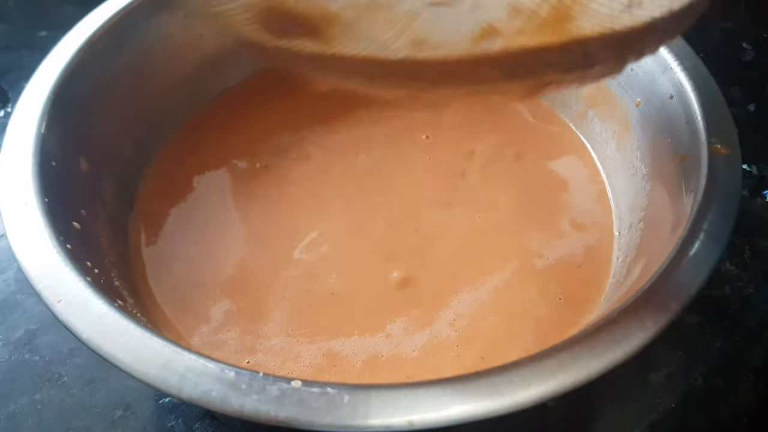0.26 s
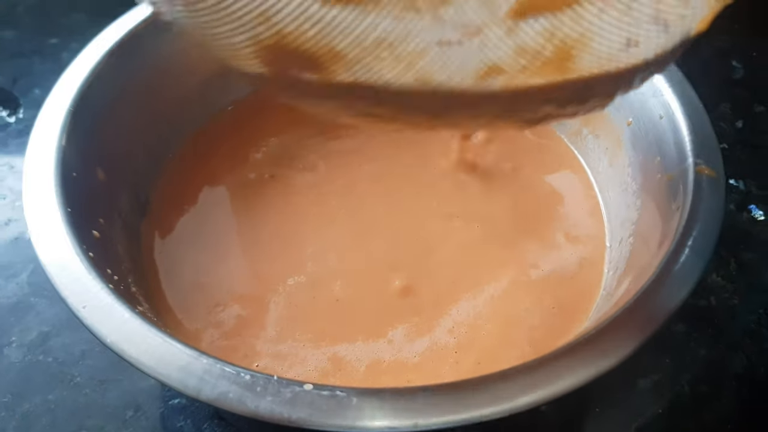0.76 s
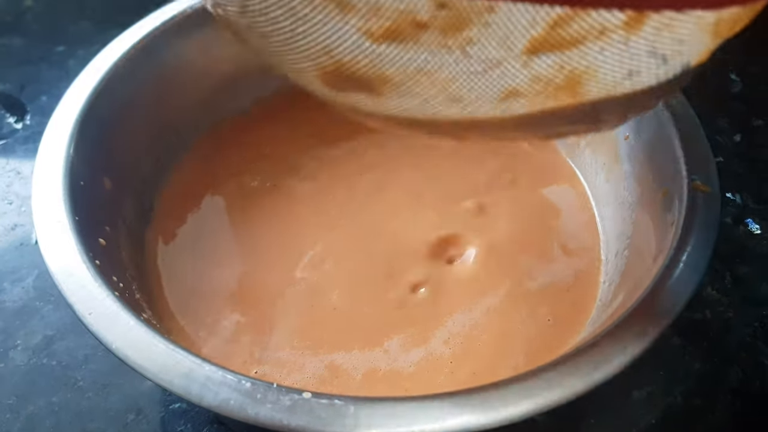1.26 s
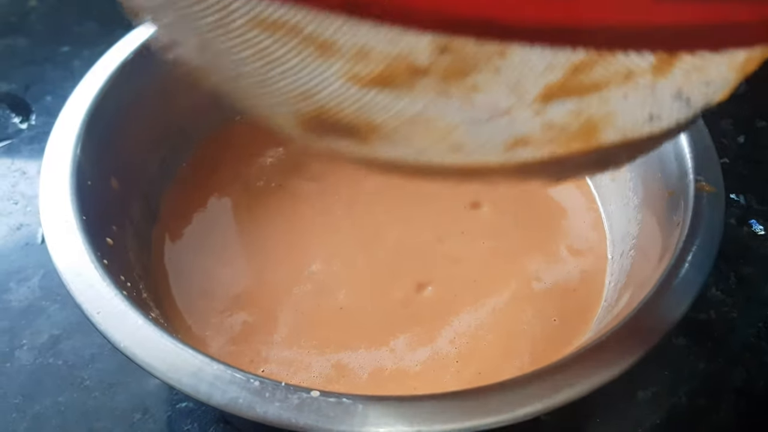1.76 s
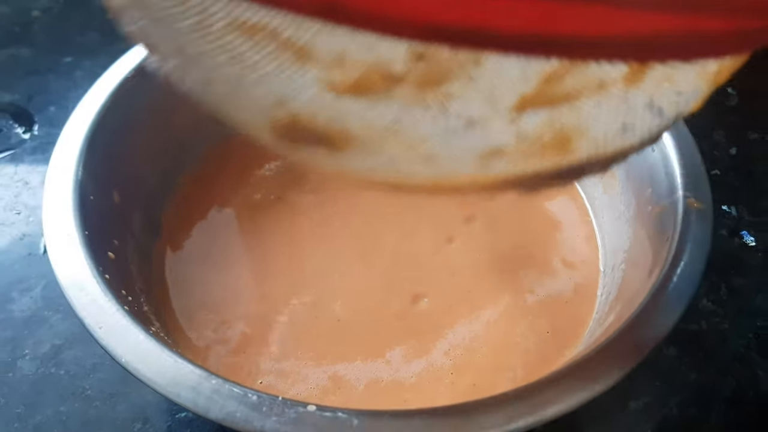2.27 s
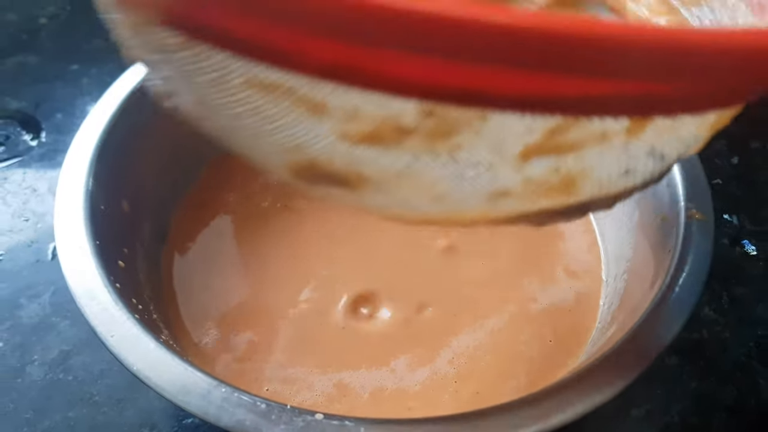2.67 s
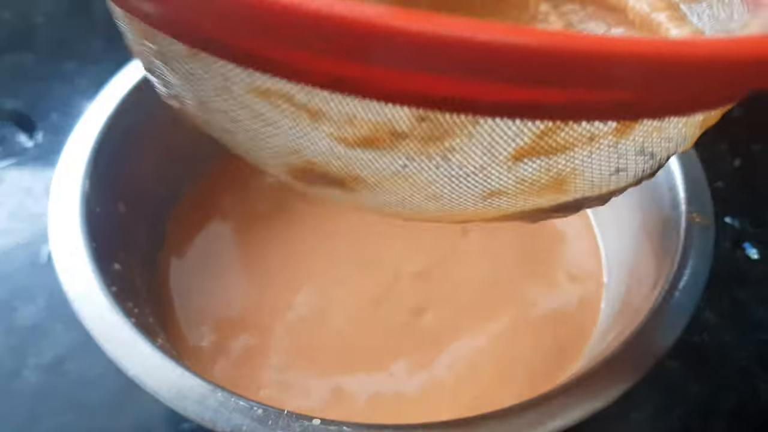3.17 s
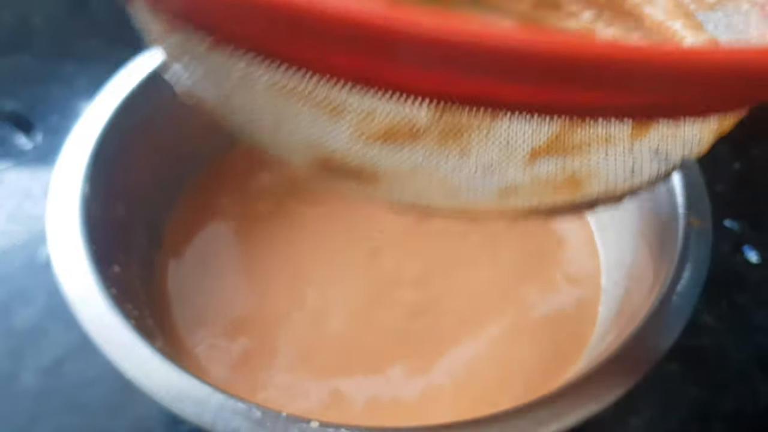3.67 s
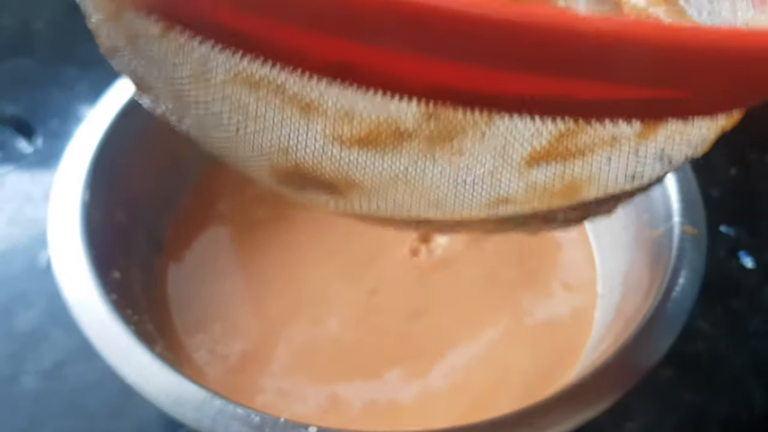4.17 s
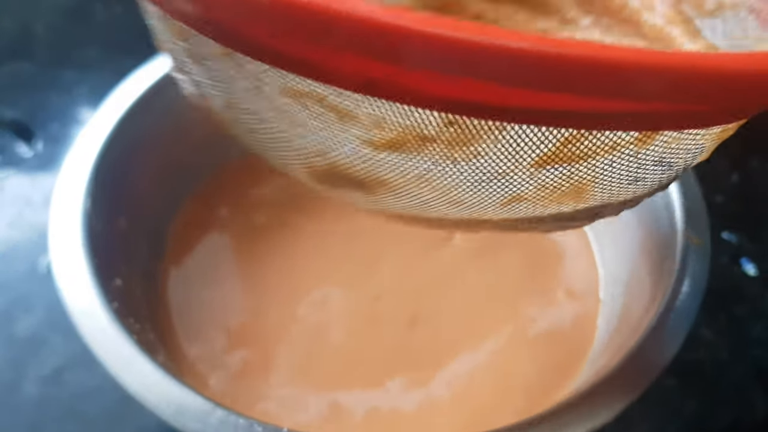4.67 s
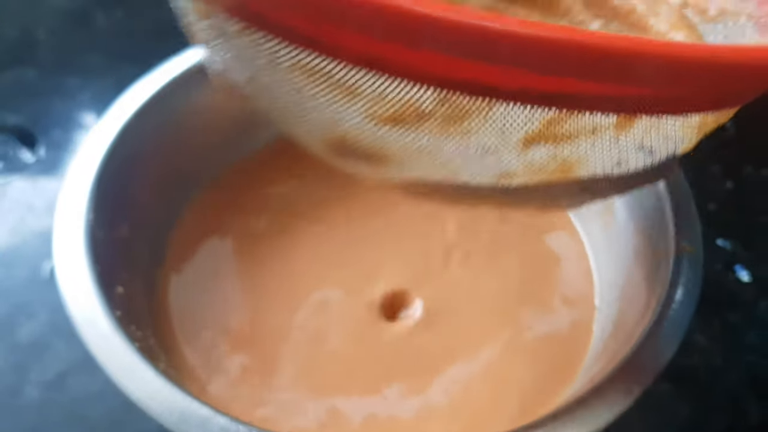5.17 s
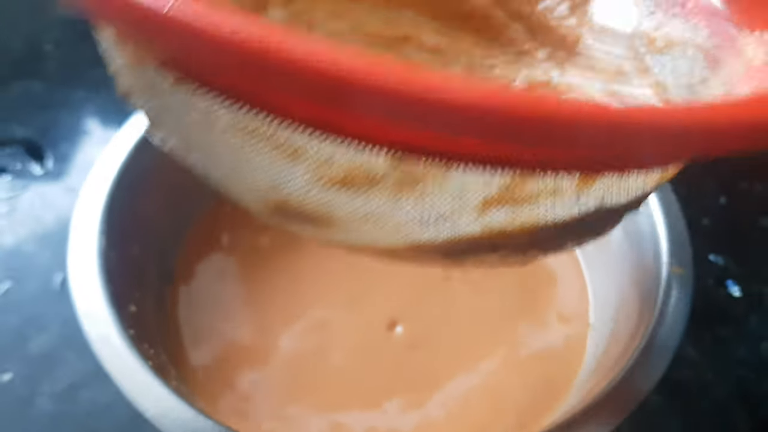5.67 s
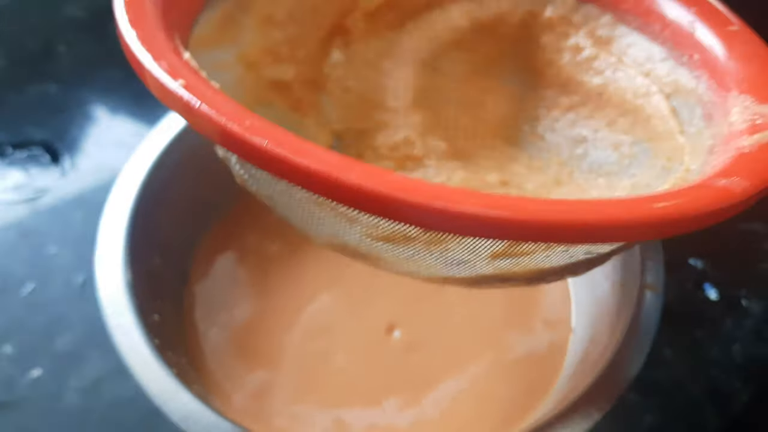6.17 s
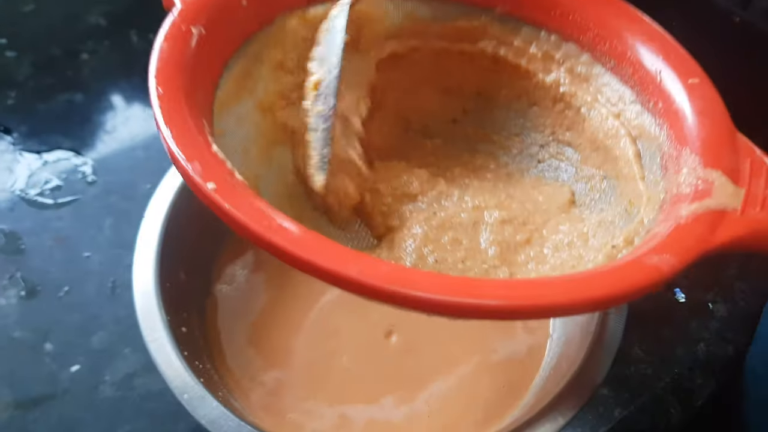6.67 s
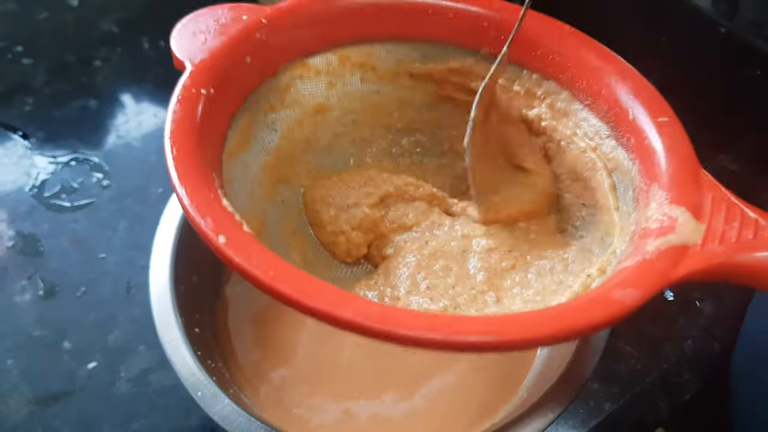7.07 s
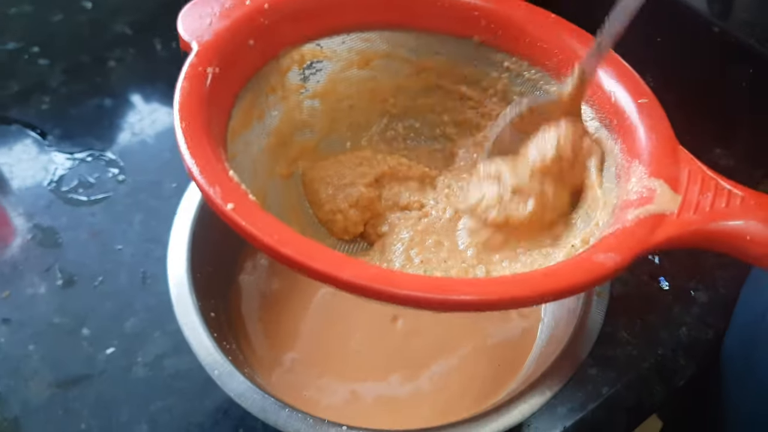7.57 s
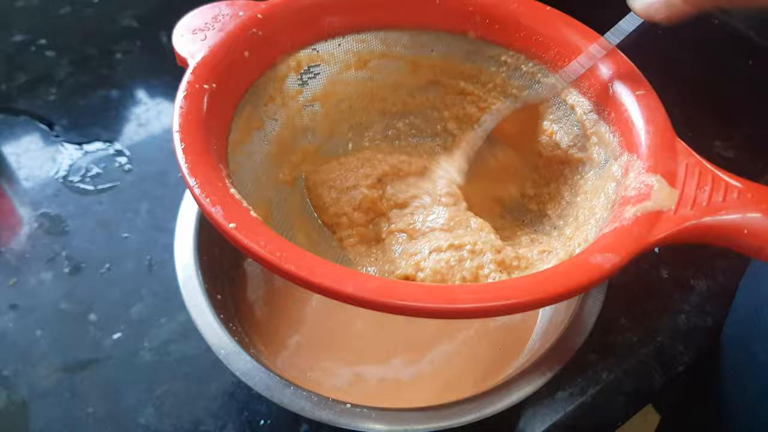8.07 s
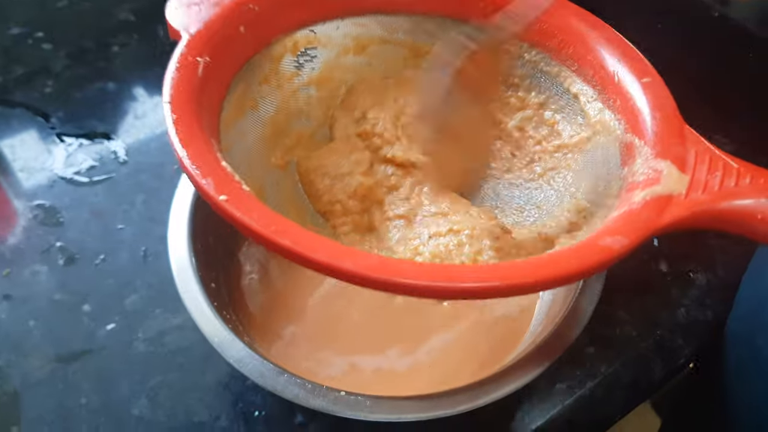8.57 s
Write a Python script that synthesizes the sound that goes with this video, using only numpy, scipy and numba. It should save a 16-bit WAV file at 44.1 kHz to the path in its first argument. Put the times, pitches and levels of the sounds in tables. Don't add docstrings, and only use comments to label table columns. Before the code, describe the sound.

Close stereo phone perspective in a small, hard-walled kitchen. From 0 to 5.6 seconds a metal spoon stirs thick puree round a wire-mesh strainer, roughly three strokes per second. Each stroke swells and fades as a bright, grainy rasp with wet hiss, hollow mesh resonance and a short buzzy zip; light taps mark some landings and the plastic frame rumbles dully. Strokes grow stronger and brighter to a peak around 3.2, then soften again. At 5.7 the rhythm breaks: clustered knocks and short scrapes at 6.0-6.4, a pause, then a hard double knock and the loudest scrape at 6.8-6.9 with a brief steel bowl ring. A long drag follows at 7.3-7.6, then spaced sharp taps with scrapes at 7.9, 8.2 and 8.6. Behind are low compressor hum, soft street air and an engine pulling away faintly, early and again around 5-7.

```python
import sys
import numpy as np
from scipy import signal
from scipy.fft import rfft, irfft
from scipy.io import wavfile
from scipy.ndimage import uniform_filter1d
from numba import njit

SR = 44100
rng = np.random.default_rng(int(sys.argv[2]) if len(sys.argv) > 2 else 0)


def unload_wav(signal):
    wavfile.write(
        sys.argv[1],
        SR,
        np.round(np.clip(np.atleast_2d(signal).T, -1, 1) * 32767).astype(np.int16),
    )


def attenuation_scalar(level_db):
    decades = np.asarray(level_db, float) / 20
    return 10 ** decades


N = 388962
T = np.arange(N) / SR
PORTS = np.array([[1], [-1]])

# touch-down t/s, landing level/dB, rise to fastest/s, peak rasp level/dB, 20 dB swell/s
STIRS = [(-0.06, -47.1, 0.075, -31.0, 0.141), (0.239, -50.1, 0.113, -32.8, 0.113),
         (0.543, -47.8, 0.101, -31.0, 0.095), (0.873, -60.3, 0.097, -32.2, 0.102),
         (1.165, -63.0, 0.119, -32.5, 0.103), (1.478, -61.2, 0.111, -32.3, 0.12),
         (1.778, -43.1, 0.125, -29.3, 0.083), (2.095, -49.1, 0.129, -28.4, 0.062),
         (2.413, -46.1, 0.123, -27.0, 0.047), (2.75, -60.7, 0.081, -25.2, 0.05),
         (3.108, -50.4, 0.051, -22.4, 0.046), (3.393, -52.0, 0.056, -29.2, 0.084),
         (3.652, -37.9, 0.13, -32.9, 0.08), (3.939, -55.0, 0.104, -33.0, 0.12),
         (4.251, -63.5, 0.102, -32.0, 0.107), (4.535, -43.1, 0.114, -32.8, 0.1),
         (4.791, -46.9, 0.147, -33.3, 0.109), (5.125, -42.0, 0.134, -33.6, 0.137),
         (5.44, -62.5, 0.096, -30.3, 0.086)]
# touch-down t/s, landing level/dB, attack/s, peak rasp level/dB, time to lift/s
SCRAPES = [(2.66, -59.6, 0.07, -56.9, 0.081), (2.9, -50.6, 0.063, -49.1, 0.159),
           (3.26, -49.8, 0.066, -53.2, 0.147), (5.714, -32.6, 0.003, -41.6, 0.021),
           (5.889, -45.7, 0.024, -35.0, 0.079), (6.046, -42.8, 0.008, -31.4, 0.016),
           (6.243, -47.8, 0.046, -30.6, 0.078), (6.378, -32.6, 0.023, -32.6, 0.047),
           (6.772, -47.7, 0.003, -44.2, 0.015), (6.83, -40.2, 0.024, -17.2, 0.031),
           (6.87, -42.4, 0.042, -30.0, 0.123), (7.212, -50.0, 0.036, -43.7, 0.098),
           (7.297, -35.2, 0.1, -26.1, 0.267), (7.929, -40.2, 0.073, -39.1, 0.101),
           (8.235, -48.3, 0.104, -31.5, 0.185), (8.628, -35.1, 0.006, -44.7, 0.003),
           (8.65, -55.2, 0.036, -41.1, 0.066)]
# touch-down t/s, landing level/dB, attack/s, peak rasp
# level/dB, time to lift/s
MORE_SCRAPES = [(2.755, -52, .03, -46, .05), (3.49, -44, .03, -41, .06), (5.6, -44, .04, -43, .11),
                (6.4, -42, .022, -36, .025), (7.365, -36, .04, -28, .055)]
# middle t/s, wire crossings f/Hz, glide/(octave/s), level/dB, octave level/dB
ZIPS = [(0.985, 470, 0, -42, -39), (1.3, 474, .3, -39, -49), (1.6, 461, -.8, -43, -42),
        (1.92, 488, 3.5, -40.5, -43), (2.22, 485, 3, -41.5, -33), (2.535, 490, 3, -58, -33),
        (2.815, 515, 5, -55, -25), (2.872, 630, -5, -36, -48), (3.164, 730, 1, -29, -37),
        (3.441, 612, -1, -34.5, -42), (3.77, 360, 6, -50, -48), (4.025, 370, 1, -45.5, -41.5),
        (4.335, 480, 5, -40, -39), (4.62, 362, 2.5, -43.5, -38), (4.93, 445, 8, -46, -43),
        (6.919, 403, -5, -48, -35), (6.982, 286, 0, -50, -31), (7.255, 488, 2.5, -45, -52),
        (7.328, 397, 0, -43, -38), (7.545, 385, -2.7, -48, -48), (8.378, 568, 2.5, -42, -52),
        (8.715, 430, -2.8, -42, -52)]
# t/s, cup level/dB re rasp, rim level/dB re rasp, skin f/Hz
HOLD = [(0, 2.5, -5, 980), (1.35, 3, -2.5, 930), (1.92, 1, -3, 940), (2.55, 0, -3.5, 947),
        (2.84, -1, -2, 1040), (3.17, -4, -3.5, 800), (3.46, 0, -2.5, 920), (5.7, 1.5, -1.5, 880),
        (6.09, 2.5, 1, 863), (6.3, 0, -3, 928), (6.85, -7, -9, 1010), (6.93, -3, 7, 760),
        (7.39, -4, 2, 819.4), (7.56, -5.5, -7, 800), (7.98, 4, 0, 960), (8.28, 0, -2, 900),
        (8.41, -3, 5, 850), (8.7, 1, -9, 737)]
# f/Hz, level/dB per Hz
RASP = [(1470, -19), (2500, 0), (5450, -0.5), (7290, -4.5), (7950, -14.5), (9090, -4.5), (12000, -1),
        (15300, -8), (16000, -31.5), (16400, -42)]
# f/Hz, width/Hz, level/dB
CUP_MODES = [(685, 53, -8), (790, 75, 2.5), (899, 69, 3.5), (1126, 254, 4), (1217, 47, -6.5)]
# f/Hz, width/Hz, level/dB
RIM_MODES = [(1485, 180, -3), (1763, 76, 0.5), (1969, 74, 2), (2260, 570, -13)]
# t/s, peak level/dB, drum f/Hz, crack level/dB re peak
TAPS = [(0.244, -24.5, 929, -12), (0.545, -25, 939, -11), (0.699, -18, 693, -5), (1.084, -25.5, 790, -9),
        (2.412, -24.5, 912, -7.5), (2.962, -26.5, 900.2, -4), (3.039, -28.5, 890.6, -10),
        (3.32, -37, 1090, -4), (3.653, -23, 972, -6), (5.128, -23.5, 1000, -8.5), (5.716, -26.5, 1011, 0.5),
        (6.049, -17.5, 980, -14), (6.063, -12, 797, -17), (6.099, -30, 727, 0), (6.139, -34, 1010, -5),
        (6.379, -16, 942, -9), (6.419, -29, 907, -10.5), (6.773, -17, 1031, -17), (6.784, -15, 644, -28),
        (6.785, -13, 980, -21), (6.858, -13, 1200, -6), (6.874, -14.5, 938.6, -12), (7.214, -24, 920, -12),
        (7.299, -19, 800.5, -6.5), (7.729, -44, 651, -7), (7.799, -43, 738, -14), (7.929, -8, 993, -15),
        (8.235, -16, 664, -13), (8.628, -14.5, 685, -12), (8.787, -37, 688, -1)]
# t/s, peak level/dB, f/Hz, t60/s
BOWL_RINGS = [
    (6.9, -25, 1555, 0.25),
    (6.99, -34, 564, 0.27),
]
# t/s, level/dB
FLEXES = [(.11, -38), (.41, -38.5), (.72, -38), (1.03, -42.5), (1.33, -43.5), (1.64, -42.5), (1.95, -46),
          (3.5, -44), (3.8, -46), (4.13, -44.5), (4.4, -44), (4.7, -47), (5.001, -46.5), (5.3, -44),
          (5.6, -42), (6.97, -60)]
# f/Hz, width/Hz, level/dB
FRAME_MODES = [(211, 140, -5.5), (279, 106, 5.5)]
# f/Hz, level/dB rms
HUM = [(53, -45.5), (97, -65), (105.5, -63), (264, -59), (397, -61), (528, -66)]
# t/s, firing f/Hz, level/dB
ENGINE = [
    [(0, 61.85, -46), (.75, 63.1, -45), (1.3, 63.7, -41), (1.7, 64.5, -47), (2.2, 66.62, -62),
     (3.0, 68.87, -53), (3.7, 70, -60)],
    [(4.4, 58.8, -67), (5.1, 61.2, -50), (5.5, 61.5, -42.5), (6.0, 63.4, -43), (6.4, 65.43, -48),
     (6.9, 68.9, -54), (7.4, 71, -63)],
]
# multiple of firing f, level/dB rms
ENGINE_ORDERS = [
    [(1.4, -58.5), (1.82, -63)],
    [(1.28, -65), (1.47, -58), (2, -62.5)],
]
# f/Hz, level/dB per Hz
AIR = [(30, -13), (45, -4), (90, 4.5), (125, -4.5), (190, -1.5), (300, 1), (400, -11.5), (470, -10),
       (1900, -19), (6000, -33), (16000, -52)]


def scrape():
    rasp_db = contact()
    press_db = uniform_filter1d(rasp_db, SR // 50)
    load_db = np.clip(press_db, -70, None) + 35
    hold_s, *columns = np.transpose(HOLD)
    cup_db, rim_db, skin_hz = (np.interp(T, hold_s, column) for column in columns)
    cup_db = cup_db - 0.05 * load_db
    rim_db = rim_db - 0.1 * load_db
    skin_hz = skin_hz + 1.5 * load_db

    zips, edges, cycle = weave(jitter=0.015, over_under=0.18)
    grip = attenuation_scalar(rasp_db + 1.78 * walk(60)) * (1 + 0.77 * cycle)
    share = attenuation_scalar([4.5 * walk(12) for _ in range(3)])
    share = share / np.sqrt(np.sum(share ** 2, axis=0))
    rasp_response = colour(RASP)[None]
    sound, wires = 0, 0
    for part in share:
        rasp_path = unit(signal.fftconvolve(tail(0.015)[:, :1024], rasp_response)[:, :1024])
        cup_path = body(CUP_MODES, 0.6, 0.075)
        rim_path = body(RIM_MODES, 1.74, 0.031)
        patch = level(ticks(6000.0, 3.05), 0) * part * grip
        sound = sound + through(patch[None], np.concatenate([rasp_path, cup_path, rim_path]))
        wires = wires + patch

    skin = attenuation_scalar(15.0) * resonate(wires, np.clip(skin_hz, 400, 1500), 136.0)
    hoop = attenuation_scalar(14.5) * resonate(wires, 1950 * (1 + 0.03 * walk(9)), 220.0)
    rasp = sound[:2]
    cup = (sound[2:4] + skin) * attenuation_scalar(cup_db)
    rim = (sound[4:] + hoop) * attenuation_scalar(rim_db)
    rim = rim + attenuation_scalar(-26) * through(edges[None], body(RIM_MODES, 1.62, 0.01))

    hiss = attenuation_scalar(-3) * through(rng.standard_normal((2, N)) * grip, unit(rasp_response))
    lean_db = np.clip(3.5 + 0.06 * (press_db + 22.5), 0, None)
    rasp = (mirrored(rasp) + hiss) * attenuation_scalar(-0.5 + PORTS * lean_db)
    mesh = rasp + rim * attenuation_scalar(1.7 * PORTS - 0.5) + cup * attenuation_scalar(1.63 * PORTS - 0.6)
    open_mesh = signal.butter(4, 360, "high", fs=SR, output="sos")
    return signal.sosfilt(open_mesh, mesh) + zips * attenuation_scalar(1.1 * PORTS + 5.5)


def contact():
    landing_db_per_s, ebb_stretch, swell_power, drag_db = 180, 1.43, 1.22, -62
    ease_s, ease_db = 0.105, -14
    sag_db_per_s, lift_db_per_s = 90, 800
    smear_db, smear_db_per_s = -9, 165
    stir_end_s = SCRAPES[4][0]
    power = attenuation_scalar(2 * drag_db) * (T < stir_end_s) + attenuation_scalar(-180)

    ends_s = [row[0] for row in STIRS[1:]] + [stir_end_s]
    for (start_s, land_db, rise_s, peak_db, swell_s), end_s in zip(STIRS, ends_s):
        down = slice(max(int(start_s * SR), 0), int(end_s * SR))
        late_s = T[down] - start_s - rise_s
        span_s = np.where(late_s > 0, ebb_stretch * swell_s, swell_s)
        sweep_db = peak_db - 20 * np.abs(late_s / span_s) ** swell_power
        sweep_db = sweep_db + ease_db * np.clip(1 - (end_s - T[down]) / ease_s, 0, 1)
        landing_db = land_db - landing_db_per_s * (T[down] - start_s)
        power[down] += attenuation_scalar(2 * sweep_db) + attenuation_scalar(2 * landing_db)

    for start_s, land_db, attack_s, peak_db, lift_s in SCRAPES + MORE_SCRAPES:
        down = slice(int(start_s * SR), int(start_s * SR) + SR // 2)
        t = T[down] - start_s
        sag_s = np.clip(t - attack_s, 0, max(lift_s - attack_s, 0))
        held_db = np.interp(t, [0, attack_s], [land_db, peak_db]) - sag_db_per_s * sag_s
        off_s = np.clip(t - lift_s, 0, None)
        power[down] += attenuation_scalar(2 * (held_db - lift_db_per_s * off_s))
        power[down] += attenuation_scalar(2 * (held_db + smear_db - smear_db_per_s * off_s))
    return uniform_filter1d(10 * np.log10(power), SR // 200)


def weave(jitter, over_under):
    zip_s, edge_db = 0.068, -11
    hz, first, second = np.full(N, 400.0), np.zeros(N), np.zeros(N)
    for middle_s, rate_hz, glide, db, octave_db in ZIPS:
        inside = slice(int((middle_s - zip_s / 2) * SR), int((middle_s + zip_s / 2) * SR))
        t = T[inside] - middle_s
        arc = (2 * t / zip_s) ** 2
        slowing = 0.5 * (rate_hz / 720) ** 3 * arc
        hz[inside] = rate_hz * 2 ** (glide * t - slowing)
        first[inside] = attenuation_scalar(db + edge_db * arc)
        second[inside] = attenuation_scalar(octave_db + edge_db * arc)
    first, second = uniform_filter1d([first, second], SR // 150)
    turn = 2 * np.pi * np.cumsum(hz * (1 + jitter * walk(250))) / SR
    stand = 1 + over_under * np.cos(turn / 2)
    tone = first * np.sin(turn) + second * np.sin(2 * turn)
    edges = np.sqrt(np.abs(first * second)) * sum(np.cos(k * turn) for k in range(3, 8))
    cycle = (first > attenuation_scalar(-90)) * np.cos(turn)
    return stand * tone, stand * edges, cycle


def ticks(rate_hz, scatter_db):
    moment, force = rng.random((2, N))
    sign = np.sign(moment - rate_hz / SR / 2)
    return sign * (moment < rate_hz / SR) * attenuation_scalar(-scatter_db * np.log(force + 0.022))


def mirrored(x):
    lags_s = [np.clip(0.0007 + 0.0002 * walk(7), 0, None) for _ in x]
    echo = np.array([np.interp(T - lag_s, T, port) for lag_s, port in zip(lags_s, x)])
    return x + attenuation_scalar(-7) * echo


def taps():
    out = np.zeros((2, N + 8192))
    chance = rng.standard_normal((len(TAPS), 2, 1024))
    crack_response = unit(colour(RASP))[None]
    for (s, db, hz, crack_db), noise in zip(TAPS, chance):
        start = int(s * SR)
        crack = through(noise * np.exp(-T[:1024] / 0.0015), crack_response)[:, :1024]
        drum = attenuation_scalar(-5.5) * ring(hz, 100, size=1024)
        blow = drum + attenuation_scalar(crack_db + 1) * crack * attenuation_scalar(2.5 * PORTS)
        out[:, start:start + 1024] += attenuation_scalar(db) * blow
    for s, db, hz, t60_s in BOWL_RINGS:
        start = int(s * SR)
        swell = 1 - np.exp(-T[:8192] / 0.0049)
        out[:, start:start + 8192] += attenuation_scalar(db) * swell * ring(hz, np.log(1000) / np.pi / t60_s)
    return out[:, :N]


def frame():
    load = sum(attenuation_scalar(db) * np.exp(-((T - s) / 0.049) ** 2) for s, db in FLEXES)
    return through(rng.standard_normal((1, N)) * load, body(FRAME_MODES, 0.16, 0.012))


def walls(x):
    low, high = (signal.butter(1, 2500, kind, fs=SR, output="sos") for kind in ("low", "high"))
    response = attenuation_scalar(-8) * signal.sosfilt(low, tail(0.42)) + attenuation_scalar(-16.5) * signal.sosfilt(high, tail(0.093))
    return through(x.mean(axis=0)[None], response)


def compressor():
    clock = 2 * np.pi * np.cumsum(1 + 0.001595 * walk(3)) / SR
    lines = sum(attenuation_scalar(db) * np.sin(hz * clock) for hz, db in HUM)
    return np.sqrt(2) * attenuation_scalar(0.35 * walk(7.3)) * lines * attenuation_scalar(1.3 * PORTS)


def engine():
    out = np.zeros(N)
    for (s, hz, db), orders in zip(map(np.transpose, ENGINE), ENGINE_ORDERS):
        turn = 2 * np.pi * np.cumsum(np.interp(T, s, hz)) / SR
        fade = np.clip(np.minimum(T - s[0] + 0.31, s[-1] + 0.26 - T) / 0.48, 0, 1)
        firing = attenuation_scalar(np.interp(T, s, db)) * np.sin(turn)
        upper = attenuation_scalar(2.8 * walk(3)) * sum(attenuation_scalar(order_db) * np.sin(k * turn) for k, order_db in orders)
        out = out + fade * (firing + upper)
    return np.sqrt(2) * out * attenuation_scalar(1.3 * PORTS)


def air():
    mid, side = rng.standard_normal((2, N))
    side = signal.sosfilt(signal.butter(1, 400, "high", fs=SR, output="sos"), side)
    wash = through(np.array([mid + side, 0.82 * (mid - side)]), colour(AIR, size=4096)[None])
    return level(wash, -50.5) * attenuation_scalar(1.44 * walk(0.73))


def level(x, db):
    return x * attenuation_scalar(db) / np.sqrt(np.mean(x ** 2))


def unit(response):
    return response / np.sqrt(np.mean(np.sum(response ** 2, axis=-1)))


def through(x, response):
    return signal.oaconvolve(x, response, axes=-1)[..., :N]


def colour(points, size=2048):
    hz, db = np.transpose(points)
    bins_hz = np.arange(size // 2 + 1) * SR / size
    log_gain = np.interp(np.log(bins_hz + 1), np.log(hz), db) * np.log(10) / 20
    cepstrum = irfft(log_gain)
    cepstrum[1:size // 2] *= 2
    cepstrum[size // 2 + 1:] = 0
    return irfft(np.exp(rfft(cepstrum)))[:size // 2]


def ring(hz, width_hz, size=8192):
    return np.exp(-np.pi * width_hz * T[:size]) * np.sin(2 * np.pi * hz * T[:size])


def body(modes, spread_rad, detune):
    phases = spread_rad * rng.standard_normal((len(modes), 2, 1))
    shifts = 1 + detune * rng.standard_normal(len(modes))
    t, out = T[:1024], 0
    for (hz, width_hz, db), phase, shift in zip(modes, phases, shifts):
        decay = attenuation_scalar(db) * np.sqrt(width_hz) * np.exp(-np.pi * width_hz * t)
        out = out + decay * np.sin(2 * np.pi * hz * shift * t + phase)
    return unit(out)


def tail(t60_s):
    decay = rng.standard_normal((2, SR // 2)) * np.exp(-np.log(1000) * T[:SR // 2] / t60_s)
    return decay / np.sqrt(np.sum(decay ** 2, axis=1, keepdims=True))


def walk(rate_hz):
    k = int(SR / rate_hz)
    held = np.repeat(rng.standard_normal(4096)[:N // k + 1], k)[:N]
    return 1.33 * uniform_filter1d(uniform_filter1d(held, k), k)


@njit
def resonate(x, hz, width_hz):
    y, band, low = np.empty(len(x)), 0., 0.
    for i in range(len(x)):
        g, k = np.tan(np.pi * hz[i] / SR), width_hz / hz[i]
        v = (band + g * (x[i] - low)) / (1 + g * (g + k))
        band, low, y[i] = 2 * v - band, low + 2 * g * v, k * v
    return y


def scene():
    near = scrape() + taps() + frame()
    return near + walls(near) + compressor() + engine() + air()


def band_limit(x):
    return signal.sosfilt(signal.butter(12, 16580, fs=SR, output="sos"), x)


def record(dry):
    return band_limit(dry)


dry = scene()
out = record(dry)
unload_wav(out)
```